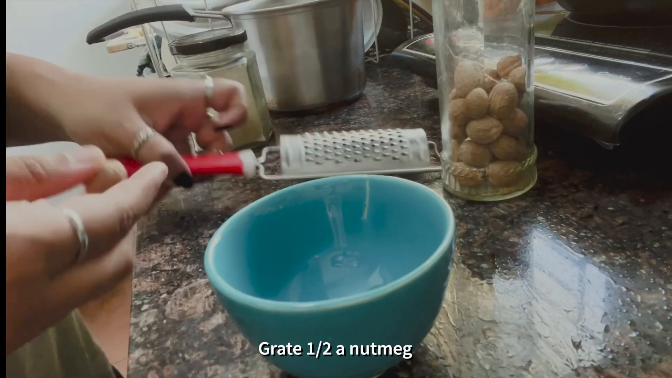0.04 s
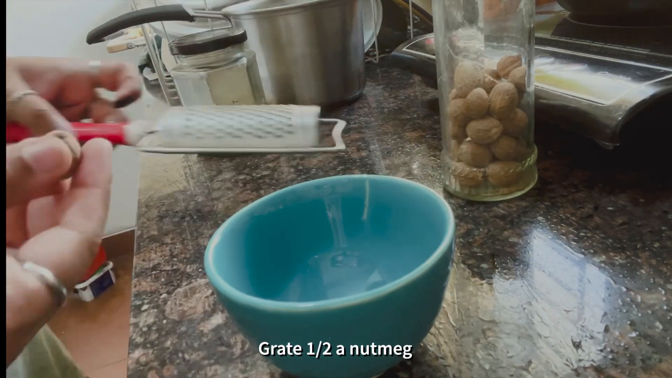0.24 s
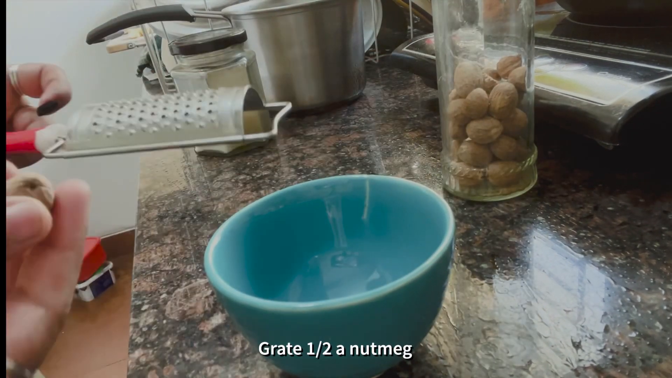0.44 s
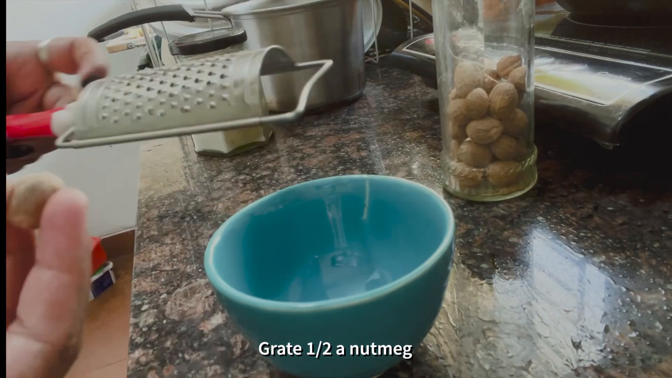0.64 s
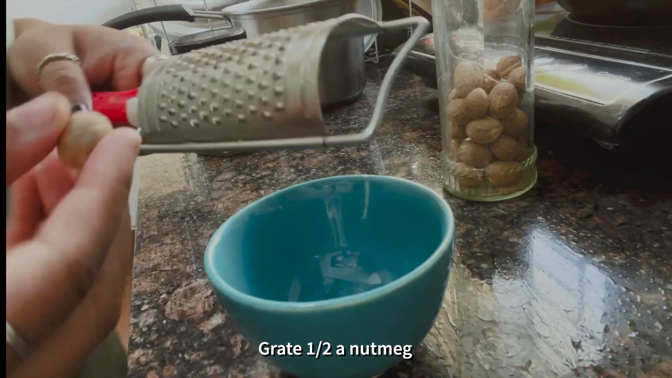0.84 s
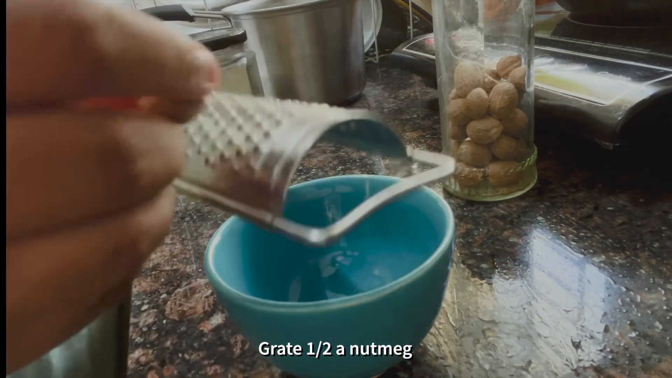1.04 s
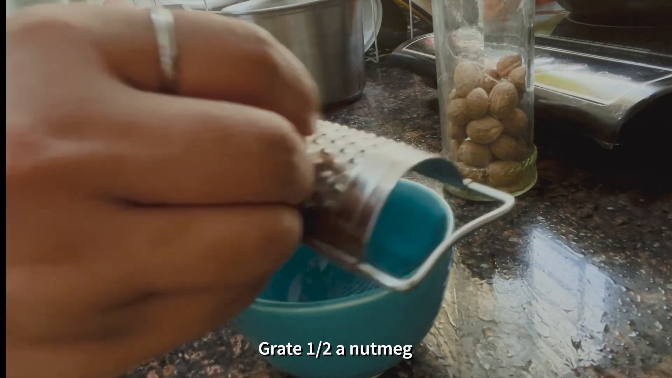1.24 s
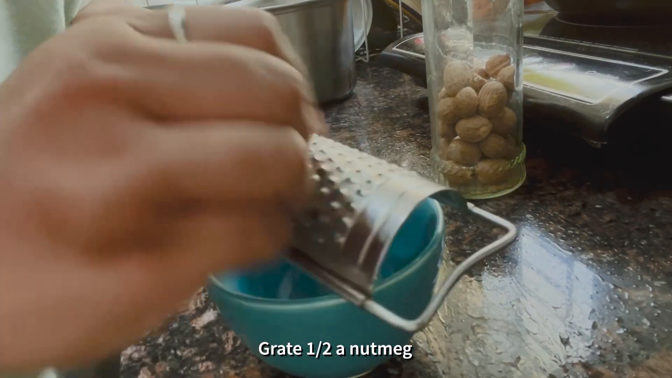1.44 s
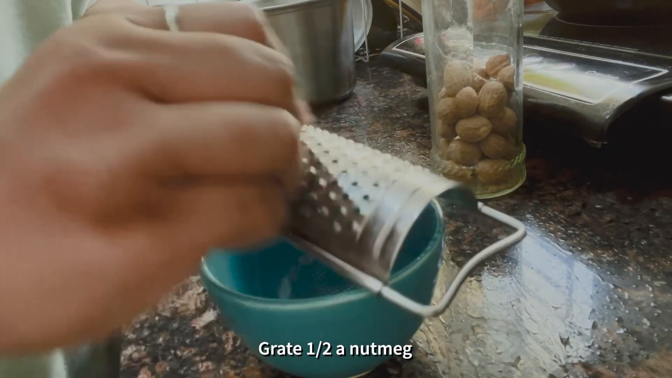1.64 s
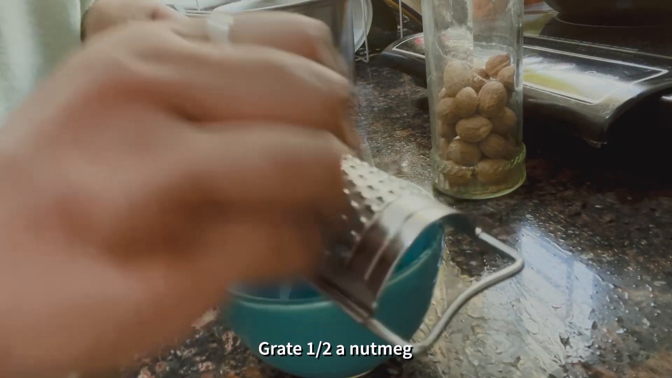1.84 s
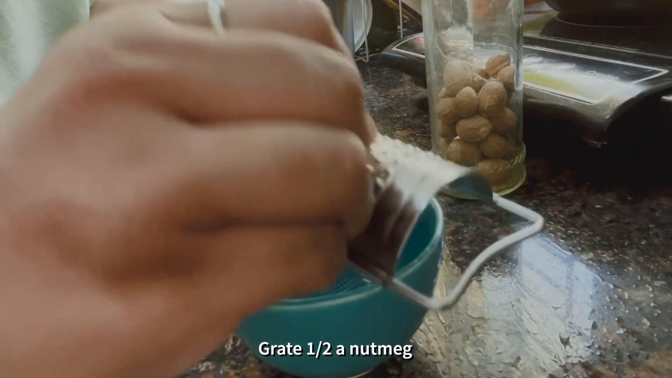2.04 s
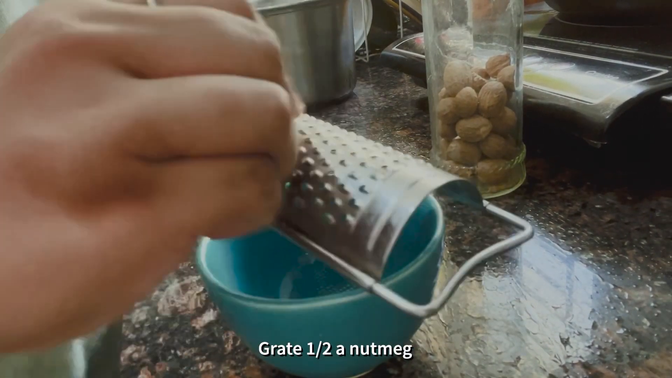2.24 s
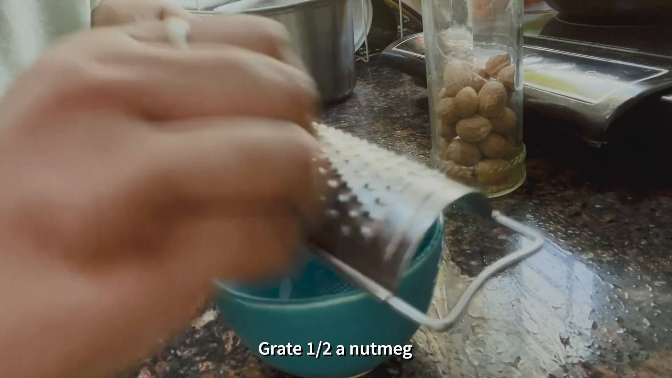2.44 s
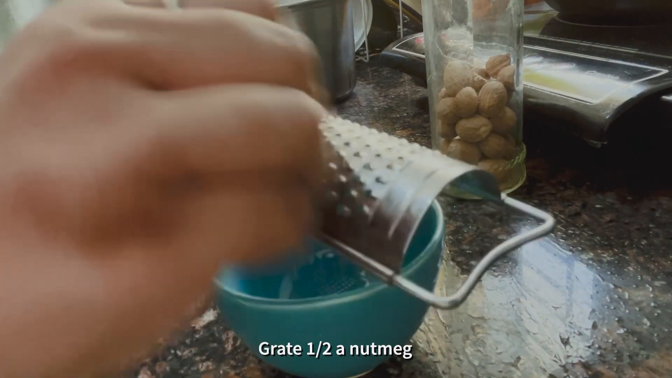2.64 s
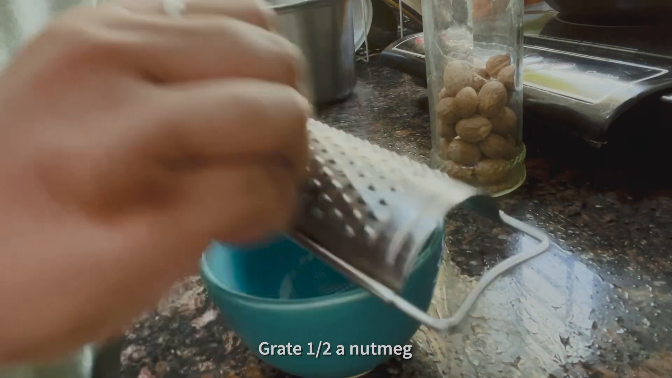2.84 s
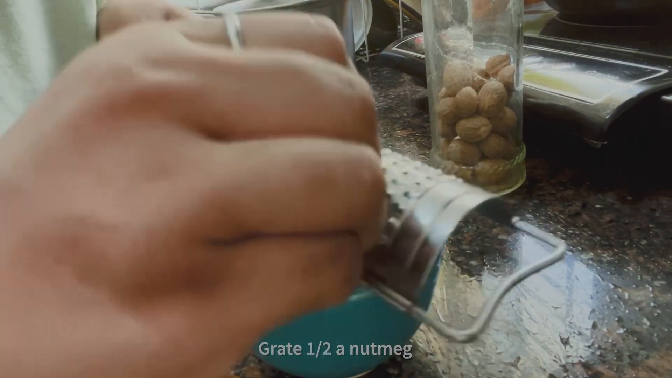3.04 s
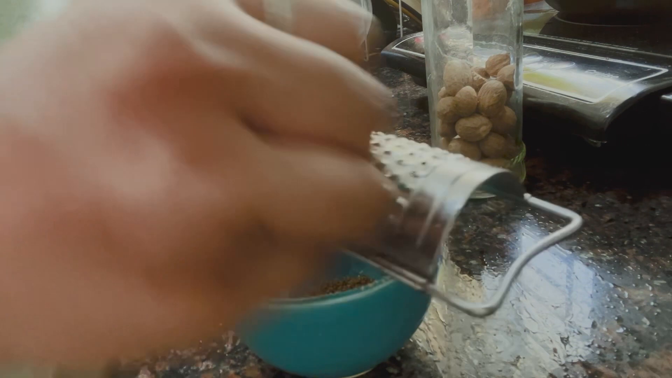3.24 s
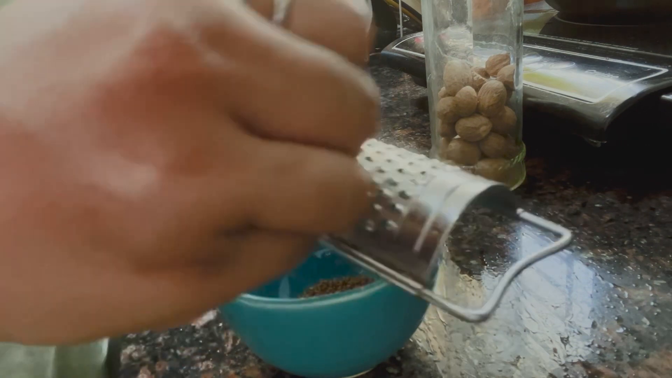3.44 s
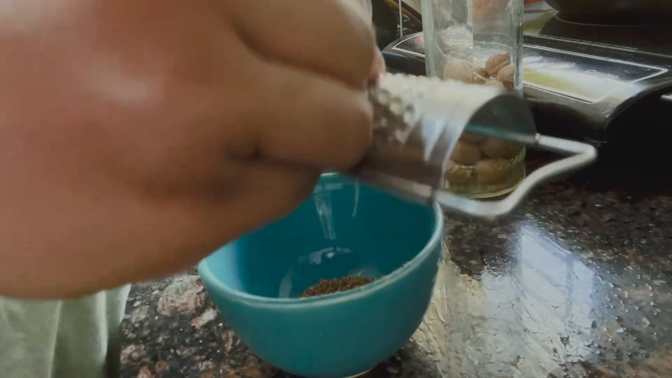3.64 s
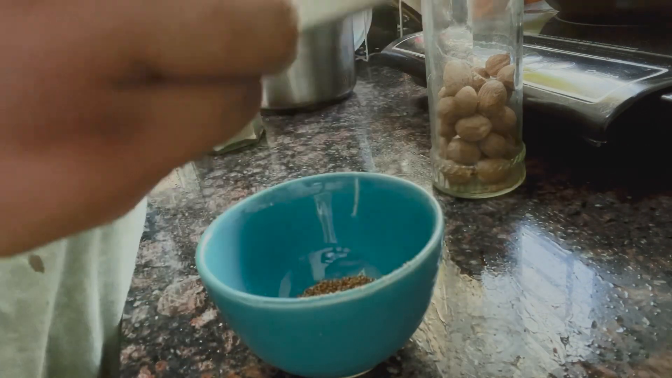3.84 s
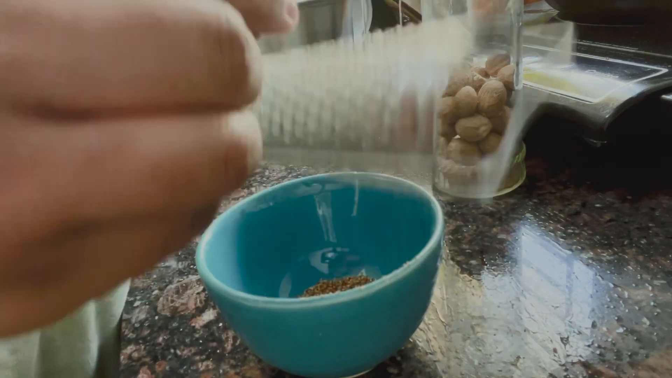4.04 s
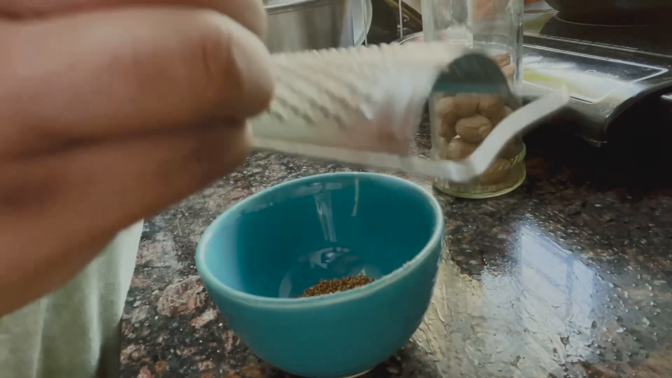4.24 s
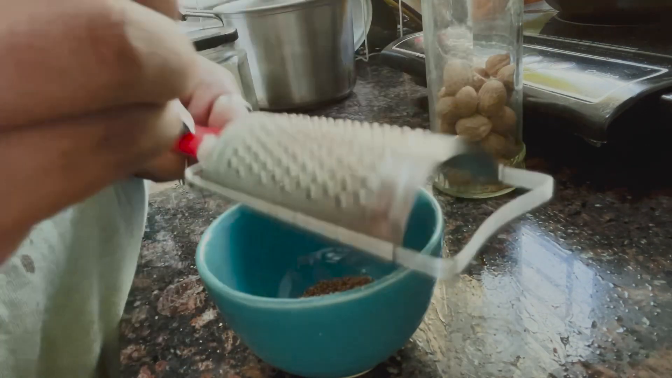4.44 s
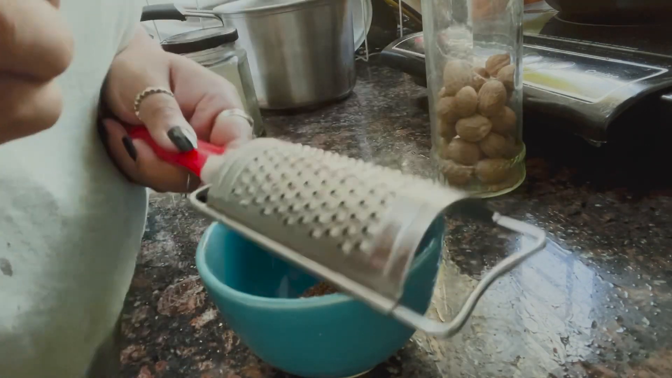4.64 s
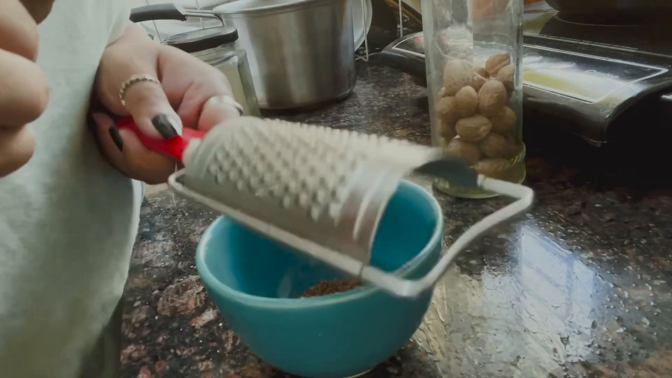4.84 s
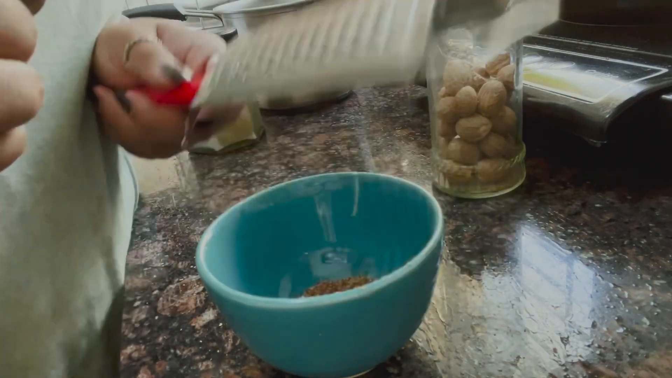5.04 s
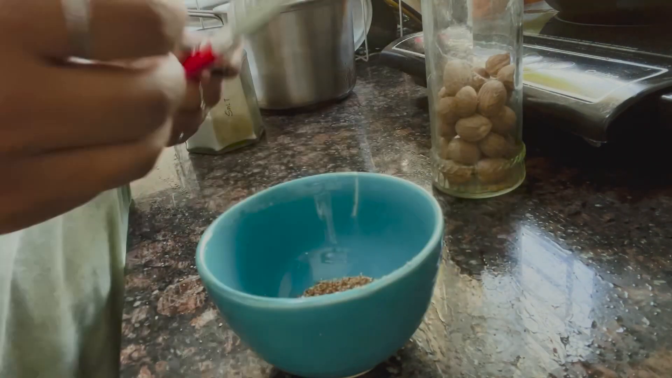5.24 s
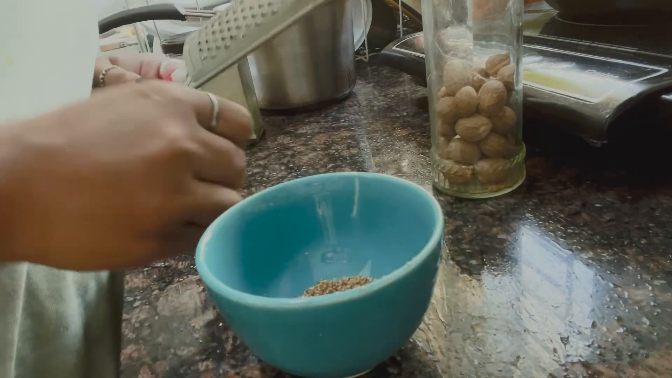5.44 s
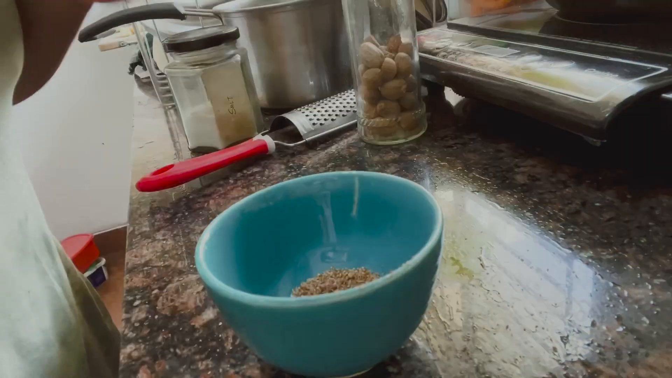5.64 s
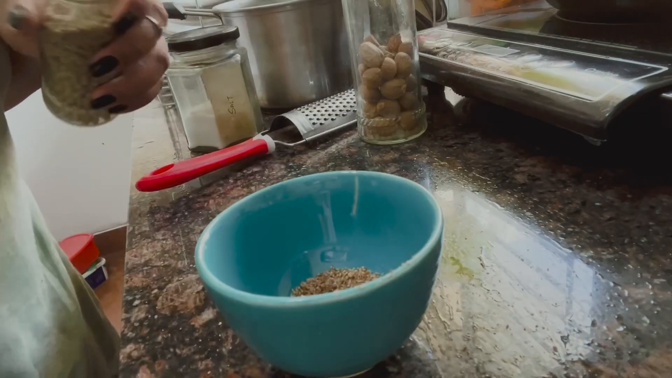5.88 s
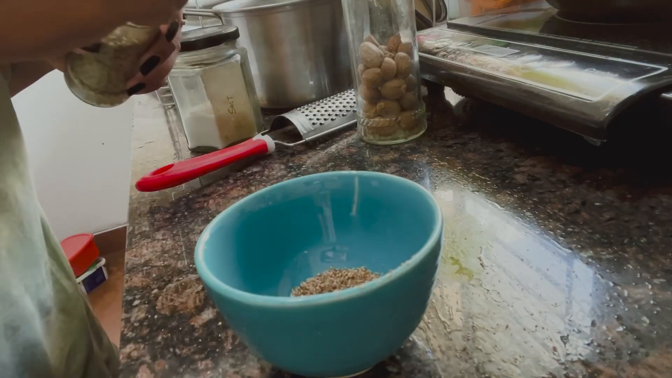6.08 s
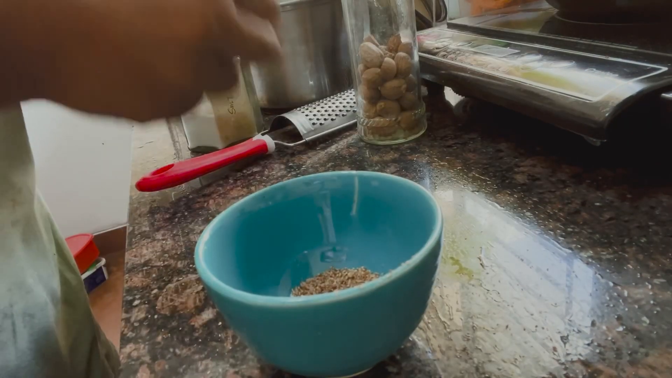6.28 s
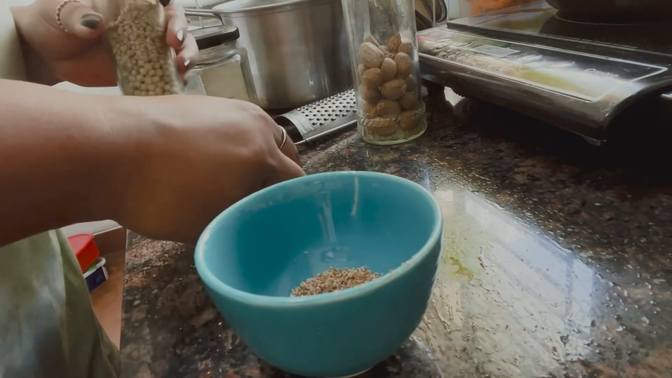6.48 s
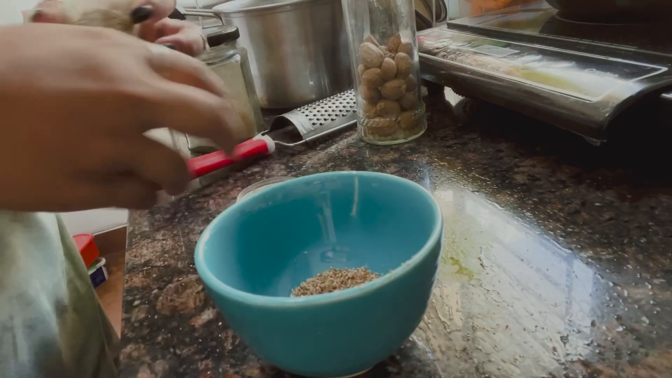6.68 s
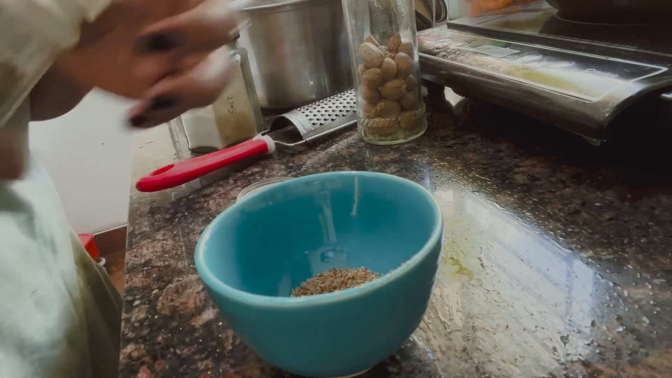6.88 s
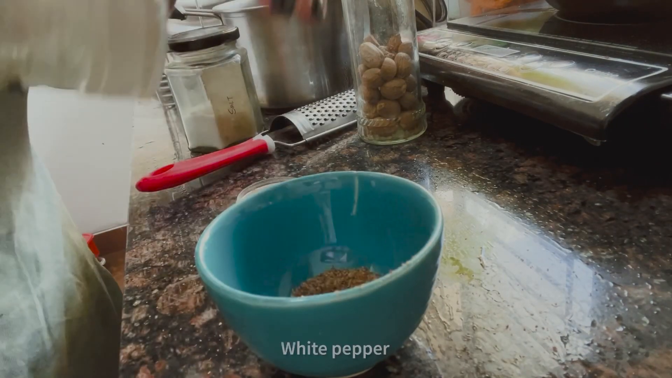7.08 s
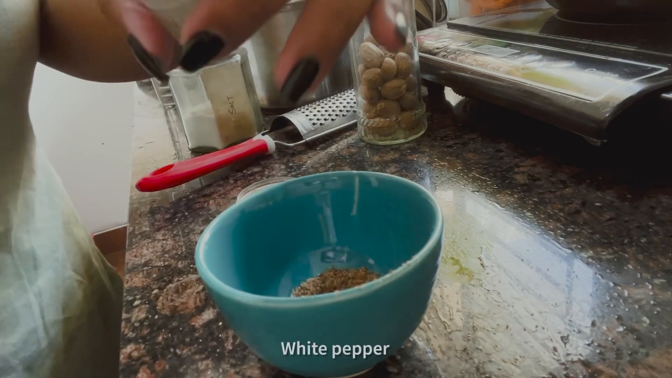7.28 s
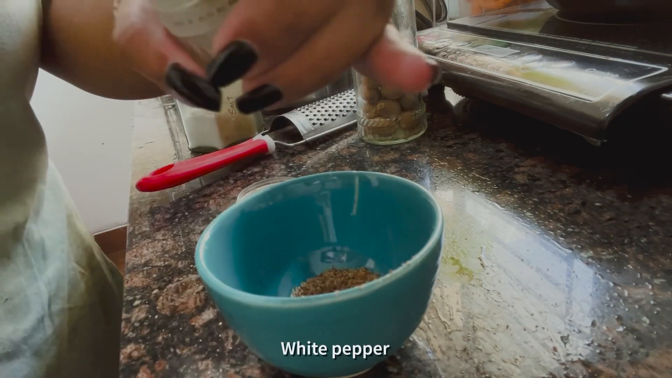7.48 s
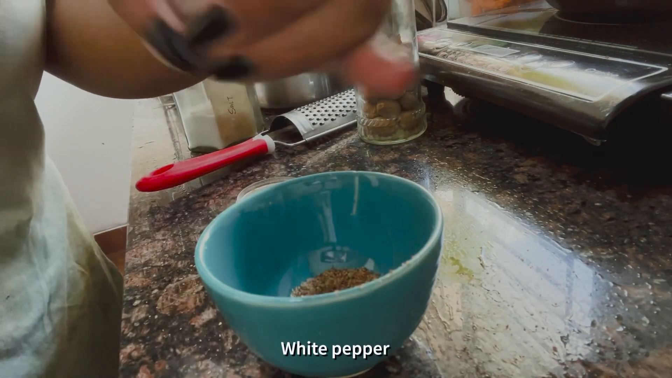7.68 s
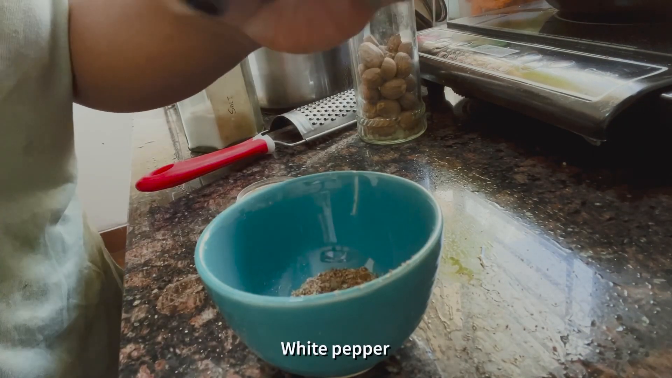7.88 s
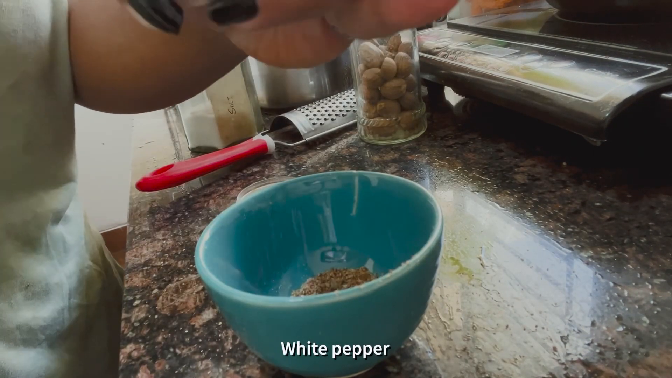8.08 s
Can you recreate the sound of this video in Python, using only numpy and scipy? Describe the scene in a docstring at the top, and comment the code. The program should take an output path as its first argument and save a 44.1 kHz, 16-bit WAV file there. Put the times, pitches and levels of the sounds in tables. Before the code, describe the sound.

A small hard-surfaced kitchen, heard close in stereo, with soft low rumble, unsteady low hum and faint hiss throughout. At 0.05 s a steel grater gives a short double clack with a brief ring. Light brushing begins near 1.2 s, and from 1.4 to 3.4 s a nutmeg is rasped to and fro, about six or seven cycles a second, gritty and bright, growing stronger after 2.5 s, with single snags and a low shudder. Sharp hollow knocks break in at 1.7 and 1.9 s, and another at 3.3 s ends it. Very faint thin whistles pass around 4 s. Five taps, 4.35 to 4.9 s, clean the grater, each with a rebound and chatter. It clacks aside at 5.3 s. Jars bump from 5.7 s, one thuds down at 6.1 s, and glass pings until 6.6 s. From 6.8 s a lid is twisted, rubbing, with dense bright clicks from 7.2 to 8 s.

```python
"""A steel grater clacks as it is taken up in a softly rumbling, humming kitchen, then a nutmeg is rubbed on it.
The rasp is many tiny filtered fractures under stroke-shaped pressure, with single snags and a low shudder.
Knocks on the grater, filtered bursts with a rebound and chatter, break in and later tap it clean over a bowl.
It is put aside with clacks; jars bump, knock and ping (bursts and decaying sines) and a lid is worked open
(clicks and a stick-slip rub). Faint thin whistles are wavering sines; rumble, hiss and hum are shaped noise."""
import sys
import numpy as np
from scipy import signal
from scipy.fft import rfft, irfft, next_fast_len
from scipy.io import wavfile
from scipy.ndimage import uniform_filter1d

SR = 44100
rng = np.random.default_rng(int(sys.argv[2]) if len(sys.argv) > 2 else 0)


def generate_wav(sig):
    """Save sig (samples, or channels by samples) to the path in sys.argv[1] as 16-bit PCM at SR."""
    pcm = np.round(np.clip(np.atleast_2d(sig).T, -1, 1) * 32767).astype(np.int16)
    wavfile.write(sys.argv[1], SR, pcm)


N = 358091
TIME_S = np.arange(N) / SR
SPAN = next_fast_len(N)
BINS_HZ = np.fft.rfftfreq(SPAN, 1 / SR)

# Levels are before room and trims; colours are relative, as colour() sets the filter energy to 1.
# room air colour: (frequency [Hz], level [dB])
AIR_COLOUR = [(20, -21), (45, -6), (100, -6.5), (150, -6.5), (335, -10.5), (600, -12.5), (760, -17.5),
              (1130, -17), (1800, -25), (4500, -34), (7000, -38), (11000, -47), (16000, -51.5)]
# likeness of the two channels in the room noise: (frequency [Hz], likeness [0-1])
AIR_LIKENESS = [(30, 0.7), (110, 0.96), (300, 0.72), (700, 0), (2000, 0)]
RUMBLE_DB = -44
# low wavering hum: (time [s], level [dB])
HUM_LEVEL = [(0, -48.5), (1.05, -44.5), (1.5, -48), (4.15, -51.5), (4.5, -59), (6.9, -59.5), (8.12, -53)]
HUM_HZ = 101.8

# to-and-fro cycles of the nut, draw then push: (time [s], draw pressure [dB], push pressure [dB])
STROKES = [(1.437, -29.5, -27.5), (1.608, -29, -33), (1.763, -28, -32), (1.922, -28, -24.5),
           (2.075, -31.5, -30.5), (2.226, -30.5, -27.5), (2.37, -31.5, -25), (2.503, -25.5, -22),
           (2.646, -25, -24), (2.783, -30.5, -19.5), (2.929, -25.5, -22), (3.065, -31.5, -21.5),
           (3.228, -30.5, -25.5)]
STOP_S = 3.37  # end of the last cycle
# shares of a cycle: start of the push, length of the draw, length of the push
TURN_SHARE, DRAW_SHARE, PUSH_SHARE = 0.47, 0.38, 0.4
DRAW_CREST, PUSH_CREST = 0.66, 0.77  # place of the hardest pressure in each half, 0-1
# nut brushing the teeth between strokes:
# (time [s], length [s], pressure [dB], crest [share of length, limited to 0.05-0.95])
BRUSH = (1.18, 1.79, -45, 3.6)
LEAD_IN_S, LEAD_IN_DB = 0.0077, -24.5  # short soft rasp leading into each knock
# single snags of a tooth, strong and faint, each breaking off a chip: (time [s], level [dB])
SNAGS = [(1.124, -43.5), (1.45, -30), (1.5365, -27), (1.785, -32.5), (1.853, -25), (1.858, -26.5),
         (1.94, -29.5), (1.951, -30), (2.0147, -27.5), (2.143, -31.5), (2.167, -21.5), (2.178, -32),
         (2.2482, -26), (2.296, -32.5), (2.3143, -26), (2.383, -42), (2.4065, -27.5), (2.463, -27),
         (2.478, -31.5), (2.553, -33), (2.583, -23.5), (2.6739, -27), (2.741, -33), (2.756, -28),
         (2.8593, -31), (2.882, -26), (3.0037, -37), (3.0153, -27), (3.0289, -20.5), (3.1528, -21.5),
         (3.163, -26), (3.177, -27), (3.509, -39.5)]
SLIPS_PER_S, SLIP_DROP_DB = 150, 11  # mean rate is a little higher, as the rate wavers
WANDER_SHARE, WANDER_S = 0.04, 0.07  # detuning either way, time between new random places
HOLD_S, HOLD_DB, HOLD_CREST = 3.2, -45.5, 0.8  # hands jolt the grater, pick-up to end of grating
# rasp colour: (frequency [Hz], level [dB])
RASP_COLOUR = [(290, -54), (500, -15), (919, -2.5), (1300, -8.5), (1740, -3.5), (2700, -4), (3250, -6),
               (3750, -10.5), (4340, 1), (6420, -6.5), (8210, -8), (11000, -4.5), (13300, -8),
               (16000, -10.5)]
# resonances of the firmly held grater: (frequency [Hz], width [Hz], lift [dB])
HELD_SHEET = [(908, 130, 8), (1694, 260, 6.5), (2205, 150, 7), (2520, 180, -3), (3300, 390, 14),
              (4257, 170, 8.5), (4540, 180, 5), (5250, 150, 8.5), (6396, 340, 12.5), (7080, 240, 8.5),
              (7590, 300, 16.5), (8560, 330, 13.5), (9050, 210, 3), (12200, 300, 2)]

# steel clacks, grater taken up and put aside:
# (time [s], contact level [dB], frame ring [dB], rattle decay [s], clink lift [dB])
CLACKS = [(.053, -21.5, -17, 0.0039, -2), (.0625, -27, -12.5, 0.021, 1), (5.2797, -19, -36, 0.00085, 8),
          (5.2845, -33, -24.5, 0.0035, 2), (5.293, -33, -31, .012, 5)]
# loose steel colour: (frequency [Hz], level [dB])
STEEL_COLOUR = [(200, -7), (700, -4), (1300, -2), (2000, -7.5), (3200, -2), (3700, -11), (4600, 1.5),
                (5800, 4.5), (7200, 2), (9000, -0.5), (11500, -1), (16000, -5)]
# resonances of the free-hanging sheet: (frequency [Hz], width [Hz], lift [dB])
FREE_SHEET = [(667, 40, 4), (1190, 160, 3.5), (4200, 290, 12.5), (5670, 120, 4.5), (8830, 230, 8),
              (10430, 250, 3.5), (11370, 750, 8)]
# free ringing of the wire frame: (frequency [Hz], level [dB], t60 [s])
FRAME_MODES = [(607, -4.5, 0.063), (913, -10, 0.055), (1134, -13.5, 0.048), (2050, -9, 0.021),
               (4100, -29, 0.033), (5180, -19, 0.05), (8730, -6, 0.05), (9330, -13, .05),
               (11300, -24, 0.051)]
# ringing of the rim under a clink: (frequency [Hz], level [dB], t60 [s])
RIM_MODES = [(5632, 2, .13), (5725, -8, .08), (6150, -6, .07)]
RIM_DB = -27  # relative to contact level plus clink lift
CLINK_HZ, CLINK_WIDTH_HZ = 6050, 1200

# knocks on the grater, one rebound each: (time [s], crack [dB], hollow ring [dB], contact decay [s],
# rebound delay [s], rebound crack [dB], rebound ring [dB], crack pitch [Hz], ring pitch [Hz],
# lift of the upper ring [dB])
KNOCKS = [(1.6826, -14, -24, 0.0037, 0.015, -11.5, -25, 4700, 1370, 15),
          (1.865, -8.5, -22, 0.0023, 0.0097, -40, -36.5, 4700, 1510, 10.5),
          (3.3345, -7, -23.5, 0.0018, 0.012, -14, -21, 4400, 1480, 13.5),
          (4.3621, -10.5, -32, 0.00048, 0.0091, -24, -21.5, 5140, 1340, 14),
          (4.4906, -19.5, -32, 0.024, 0.011, -29.5, -25.5, 5500, 1480, 10),
          (4.629, -8, -27.5, 0.0013, .013, -39, -26, 4920, 1410, 9),
          (4.7547, -9.5, -24, 0.0048, 0.0097, -25, -24.5, 4800, 1450, 8),
          (4.894, -18.5, -24, 0.017, 0.01, -17.5, -21.5, 4600, 1390, 9)]
# crack colour: (frequency [Hz], level [dB])
CRACK_COLOUR = [(500, -25), (1500, -10.5), (2700, -5.5), (4000, -10), (4900, 1), (6000, -7), (8000, -5.5),
                (11000, -12.5), (16000, -17.5)]
# hollow ring colour: (frequency [Hz], level [dB])
HOLLOW_COLOUR = [(80, -25), (200, -3.5), (330, -4.5), (600, -6), (850, -12), (1350, -0.5), (1800, -10.5),
                 (2100, -5), (2600, -19), (6000, -36)]
# colour of the loose sheet chattering after a knock: (frequency [Hz], level [dB])
CLATTER_COLOUR = [(400, -11), (1100, 2), (2500, -4.5), (3300, 3), (5500, -13), (9000, -8.5), (16000, -17)]
REBOUND_DECAY_S = 0.0018
CLATTER_DB, CLATTER_DECAY_S = -22, 0.019  # level before the crack trim
KNOCK_MODE_SHARE = 0.55  # share of the held-sheet lifts [dB] present in a knock

# faint thin whistles: (time [s], length [s], pitch [Hz], level [dB], rms waver [share of pitch])
WHISTLES = [(3.992, 0.28, 3340, -58, 0.022), (4.008, 0.15, 2960, -58, 0.012),
            (4.055, 0.21, 3545, -62, 0.018), (6.918, 0.5, 6380, -60.5, 0.016),
            (7.737, 0.22, 4720, -55, 0.003), (7.948, 0.19, 5010, -55, 0.0091),
            (7.922, 0.15, 10500, -60, 0.0035)]
WHISTLE_FLUTTER_DB = 3.5  # rms

# clicks of nails and lid on the jar: (time [s], bright snap [dB], hollow cap [dB])
LID_CLICKS = [(5.631, -71, -45.5), (5.904, -45, -62), (5.9782, -45.5, -50), (6.021, -68, -46),
              (6.5965, -45, -44), (6.633, -47, -56), (6.953, -51, -62), (7.201, -38, -54),
              (7.2415, -37, -55), (7.2643, -41, -52), (7.31, -53, -42.5), (7.422, -49, -46.5),
              (7.4584, -19, -35), (7.512, -28.5, -32.5), (7.5236, -37, -42), (7.5305, -31, -45),
              (7.568, -37, -48), (7.5744, -23, -29), (7.5778, -23, -29), (7.5932, -31, -26.5),
              (7.674, -40, -41), (7.694, -55, -40), (7.7006, -55, -45), (7.7149, -43, -43),
              (7.7192, -31.5, -40), (7.7985, -45, -42), (7.8369, -39, -32), (7.8435, -30.5, -38),
              (7.881, -44, -28), (7.889, -29, -21), (7.906, -39, -39), (8.0155, -30.5, -28)]
# twists rubbing the lid on its thread: (time [s], length [s], effort [dB])
TWISTS = [(6.788, 0.22, -57), (7.174, 0.16, -41), (7.506, 0.046, -40), (7.558, 0.1, -43),
          (7.645, 0.14, -43.5), (7.785, 0.2, -42), (7.96, 0.32, -57)]
TWIST_CREST = 0.33  # place of the hardest grip, 0-1
SNAP_DECAY_S, CAP_DECAY_S = 0.0007, 0.0009
# nails tick at random; each level is the base plus a random lift set by the spread
FINGERING_S, TICKS_PER_S, TICK_BASE_DB, TICK_SPREAD_DB = (7.2, 7.3), 31, -57, 3
# lid snap colour: (frequency [Hz], level [dB])
SNAP_COLOUR = [(1000, -10), (3000, 3.5), (4600, 1.5), (6300, 17), (7500, 16.5), (9000, 10.5), (10500, 14),
               (12500, 4), (16000, 2.5)]
# cap colour: (frequency [Hz], level [dB])
CAP_COLOUR = [(200, -10), (750, -18), (1050, 9), (1400, -1), (2000, 10), (2900, 10), (3600, -1), (4600, 2),
              (6000, -3), (12000, -25)]
# thread rub colour: (frequency [Hz], level [dB])
THREAD_COLOUR = [(600, -15), (1100, -10), (2100, 2), (3700, -1), (4600, 4.5), (5700, 2.5), (6400, 13),
                 (7200, 0), (10500, -1), (16000, -11)]

# dull bumps of jars on the counter: (time [s], length [s], level [dB], crest [share of length])
BUMPS = [(5.706, 0.048, -34, 0.2), (6.028, 0.036, -32, 0.38), (6.352, 0.018, -33, 0.43),
         (6.365, 0.087, -40, 0.1)]
# bump colour: (frequency [Hz], level [dB])
BUMP_COLOUR = [(100, -20), (250, -0.5), (370, 0), (600, -2), (760, -14), (1200, -20), (2500, -25),
               (6000, -53), (16000, -53)]
THUD_S, THUD_DB, THUD_HZ, THUD_T60_S = 6.1225, -18, 230, 0.033  # a jar is set down
# jars touching each other: (time [s], level [dB], rattle decay [s])
JAR_KNOCKS = [(6.126, -24, 0.0028), (6.132, -37, 0.0049), (6.269, -41, 0.008), (6.279, -46, .012),
              (6.49, -40.5, 0.0028), (6.633, -42.5, 0.0042)]
# jar knock colour: (frequency [Hz], level [dB])
JAR_COLOUR = [(500, -12), (1500, -10), (2100, 1.5), (2700, 8.5), (3300, 0), (4800, -7.5), (6100, -1.5),
              (7500, -4.5), (9300, -7.5), (12000, -12.5), (16000, -24)]
# jar pings: (time [s], level [dB], sustain [share of free t60])
PINGS = [(6.27, -46, 0.6), (6.4924, -31.5, 0.82), (6.636, -37, 0.18)]
# free ringing of the jar: (frequency [Hz], level [dB], t60 [s])
GLASS_MODES = [(2830, -12, 0.11), (3120, 6, 0.12), (3165, 11, 0.084), (4820, 5.5, 0.042),
               (5180, -12, 0.048), (6750, -0.5, 0.034), (6980, 3, 0.034), (9250, -16, 0.026)]

# kitchen decay: (frequency [Hz], t60 [s])
KITCHEN_DECAY = [(150, 0.4), (1000, 0.27), (4000, 0.32), (9000, 0.29), (16000, 0.25)]
# phase lead of the left channel over the right: (frequency [Hz], lead [rad])
LEFT_LEAD = [(0, 0), (350, 0), (900, -1.2), (1800, -1.3), (2600, -3), (3400, -3.9), (4000, -6.3),
             (5800, -6.4), (7000, -4.2), (8400, -3.1), (10200, -.1), (11600, .1), (12700, 3), (14000, 3.3),
             (15400, 6.2)]
# blend of the two channels by frequency: (frequency [Hz], blend [0-1, 1 = equal shares])
CHANNEL_BLEND = [(0, 0), (4000, 0), (6500, .1), (7800, .7), (16000, .75)]
EDGE_HZ = 15850


def amp(db):
    """Decibels to gain."""
    return 10 ** (np.asarray(db) / 20)


def evened(x):
    """Scales to rms 1."""
    return x / np.sqrt(np.mean(x ** 2) + 1e-20)


def read(points, hz):
    """Reads a table on a log-frequency axis."""
    f, value = np.transpose(points)
    return np.interp(np.log(hz + 1), np.log(f + 1), value)


def add(mix, s, sound):
    """Mixes a stereo sound in at time s."""
    part = mix[:, round(s * SR):][:, :sound.shape[1]]
    part += sound[:, :part.shape[1]]


def humps(peaks, hz):
    """The dB curve of a set of resonances."""
    return sum(db / (1 + (2 * (hz - f) / width) ** 2) for f, width, db in peaks)


def colour(x, spectrum, peaks=(), size=4096):
    """Causal minimum-phase filter of energy 1: a broad colour with resonances on top."""
    hz = abs(np.fft.fftfreq(size, 1 / SR))
    log_gain = np.log(amp(read(spectrum, hz) + humps(peaks, hz)))
    taps = np.fft.ifft(np.exp(np.conj(signal.hilbert(log_gain)))).real[:size // 2]
    return signal.oaconvolve(x, taps[None] / np.linalg.norm(taps), axes=1)[:, :N]


def partly_alike(a, b, same):
    """Two channels of equal power that share part of their noise."""
    return np.array([a, same * a + np.sqrt(1 - same ** 2) * b])


def blow(decay_s, same=0.56, size=8192):
    """A contact: a spectrally flattened burst that dies away; rms 1 over its first 5 ms."""
    t = np.arange(size) / SR
    decay_s = max(decay_s, 0.0003)
    a, b = rng.standard_normal((2, size))
    x = partly_alike(a, b, np.clip(same, 0, 1))
    rise_s = min(decay_s / 2, 0.0007)  # a longer contact also starts more softly
    x *= np.exp(-t / decay_s) * (1 - np.exp(-t / rise_s))
    z = rfft(x, 2 * size)
    smooth_power = uniform_filter1d(abs(z) ** 2, size // 24, axis=1)
    x = irfft(z / np.sqrt(smooth_power + 1e-12))[:, :size]
    return x / np.sqrt(np.mean(x[:, t < 0.005] ** 2))


def blows(s, db, decay_s):
    """A track of contacts; the level is that of the first 5 ms."""
    out = np.zeros((2, N))
    for at, level_db, length_s in np.broadcast(s, db, decay_s):
        add(out, at, amp(level_db) * blow(length_s))
    return out


def rings(s, db, modes, sustain=1):
    """A track of blows on an object ringing in decaying modes; a hand on it shortens every t60."""
    out, t = np.zeros((2, N)), np.arange(SR // 2) / SR
    for at, level_db, held in np.broadcast(s, db, sustain):
        ring = np.zeros((2, len(t)))
        for f, mode_db, t60_s in modes:
            turns = f * t + rng.random() + rng.random((2, 1)) / 3  # phases differ a little per channel
            ring += amp(mode_db - 60 * t / (t60_s * held)) * np.sin(2 * np.pi * turns)
        add(out, at, amp(level_db) * ring * (1 - np.exp(-t / 0.00021)))
    return out


def grains(per_s, spread_db, decay_s, count=5):
    """Tiny fractures of uneven size, spread over several contact points; rms 1."""
    size = amp(spread_db * np.minimum(rng.exponential(1, N), 3)) * (rng.random(N) < per_s / SR)
    point = rng.integers(0, count, N)
    out = np.zeros((2, N))
    for k in range(count):
        out += signal.oaconvolve((size * (point == k))[None], blow(decay_s), axes=1)[:, :N]
    return evened(out)


def kitchen(x, wet_db, early_db, count=18):
    """Direct sound, early echoes off counter and bowl, and the tail of a small hard room."""
    t = np.arange(SR // 2) / SR
    hz, when_s, z = signal.stft(rng.standard_normal((2, len(t))), SR, nperseg=256)
    decay = amp(-60 * when_s / read(KITCHEN_DECAY, hz)[:, None])
    tail = signal.istft(z * decay, SR, nperseg=256)[1][:, :len(t)]
    tail *= 1 - np.exp(-(t / 0.0068) ** 2)
    response = amp(wet_db) * tail / np.linalg.norm(tail, axis=1, keepdims=True)
    for side in response:
        delays = (rng.uniform(0.002, 0.014, count) * SR).astype(int)
        side[delays] += amp(early_db) * rng.choice([-1, 1], count) / np.sqrt(count)
    return x + signal.fftconvolve(x, response, axes=1)[:, :x.shape[1]]


def arches(rows):
    """Pressure of hand movements (s, length s, dB, crest): each swells to its crest and lets go."""
    out = np.zeros(N)
    for s, length_s, db, crest in rows:
        crest_s = s + length_s * np.clip(crest, 0.05, 0.95)
        ramp = np.interp(TIME_S, [s, crest_s, s + length_s], [0, 1, 0])
        out += amp(db) * np.sin(np.pi / 2 * ramp)
    return out


def catches(per_s, drop_db):
    """Stick-slip: at uneven intervals a contact slips free; each slip flares and dies."""
    waver = evened(uniform_filter1d(rng.standard_normal(N), 300))
    teeth = np.cumsum(per_s * np.exp(0.5 * waver)) / SR
    bite = rng.uniform(-1.5, 1, N)[teeth.astype(int)]
    return evened(amp(drop_db * (0.3 * bite - teeth % 1)))


def shifting(x, depth_db, size=256, order=9):
    """As the point of contact moves, patches of the spectrum come up and fade."""
    z = signal.stft(x, nperseg=size, noverlap=size * 3 // 4)[2]
    patches = uniform_filter1d(rng.standard_normal(z.shape[1:]), 3, axis=0)
    patches = uniform_filter1d(patches, 3 * order, axis=1)
    gain = evened(amp(depth_db * evened(patches)))
    return signal.istft(z * gain, nperseg=size, noverlap=size * 3 // 4)[1][:, :N]


def room_noise():
    """Low rumble under a faint even hiss: filtered noise, alike in both channels only at low frequencies."""
    a, b = rfft(rng.standard_normal((2, SPAN)))
    same = np.clip(read(AIR_LIKENESS, BINS_HZ), 0, 1)
    noise = colour(irfft(partly_alike(a, b, same), SPAN), AIR_COLOUR, [(328.4, 46, 5.6)])
    return noise * amp(RUMBLE_DB)


def hum():
    """A narrow band of low noise, heard as an unsteady hum."""
    band = 1 / (1 + ((BINS_HZ - HUM_HZ) / 8) ** 2)
    drone = irfft(rfft(rng.standard_normal(SPAN)) * band, SPAN)[:N]
    return evened(drone) * amp(np.interp(TIME_S, *np.transpose(HUM_LEVEL)))


def pressure():
    """Pressure on the teeth: draw and push per cycle, brushing, a short soft rasp leading into each knock."""
    moves = [(s - LEAD_IN_S, LEAD_IN_S, LEAD_IN_DB, 0.8) for s, *_ in KNOCKS]
    cycles_s = np.diff([s for s, *_ in STROKES] + [STOP_S])
    for (s, draw_db, push_db), cycle_s in zip(STROKES, cycles_s):
        moves.append((s, DRAW_SHARE * cycle_s, draw_db, DRAW_CREST))
        moves.append((s + TURN_SHARE * cycle_s, PUSH_SHARE * cycle_s, push_db, PUSH_CREST))
    return arches(moves + [BRUSH])


def travelling(x, count=3):
    """The grip retunes the sheet: random places, joined smoothly, crossfade detuned resonances."""
    turns_s = np.arange(0, N / SR, WANDER_S)
    place = np.interp(TIME_S, turns_s, rng.uniform(-1, 1, len(turns_s)))
    out = np.zeros((2, N))
    for spot in np.linspace(-1, 1, count):
        modes = [(hz * (1 + WANDER_SHARE * spot), width, db) for hz, width, db in HELD_SHEET]
        nearness = np.maximum(1 - abs(np.sin(np.pi / 2 * place) - spot), 0)
        out += colour(x * nearness, RASP_COLOUR, modes)
    return out


def grating():
    """Strokes drag the nut over the teeth: a rasp of fractures, snags, and a low shudder of the hands."""
    push = pressure()
    s, db = np.transpose(SNAGS)
    fine = amp(-10) * grains(per_s=2200, spread_db=-1.0, decay_s=0.00061)
    coarse = amp(-12.5) * grains(per_s=380, spread_db=3.5, decay_s=0.00053)
    slips = catches(SLIPS_PER_S, SLIP_DROP_DB)
    teeth = push * slips * (fine + coarse) + blows(s, db, 0.0018)
    rasp = shifting(travelling(teeth), depth_db=4)
    shudder_colour = [(25, -17.5), (70, -0.5), (170, -8.0), (350, -18.0), (700, -40.5), (2000, -59.5)]
    shudder = colour(rng.standard_normal((2, N)), shudder_colour)
    shudder = shudder + 0.2 * shudder[::-1]
    shudder *= amp(-17.0) * push + arches([(0.014, HOLD_S, HOLD_DB, HOLD_CREST)])
    return kitchen(rasp * amp([[-0.8], [0.8]]), wet_db=-13.5, early_db=-7.0) + shudder


def clacks():
    """The grater rattles briefly and its frame rings; a blow on the rim adds a bright clink."""
    s, db, ring_db, decay_s, clink_db = np.transpose(CLACKS)
    out = rings(s, ring_db, FRAME_MODES) + rings(s, db + clink_db + RIM_DB, RIM_MODES)
    for at, level_db, length_s, lift_db in zip(s, db, decay_s, clink_db):
        clink = (CLINK_HZ, CLINK_WIDTH_HZ, lift_db)
        add(out, at, colour(amp(level_db) * blow(length_s), STEEL_COLOUR, FREE_SHEET + [clink]))
    return kitchen(out, wet_db=-8.0, early_db=-3.5)


def tapping():
    """Knocks with rebound and chatter: a hard crack and the curved sheet's hollow ring, tuned by the spot."""
    out, t = np.zeros((2, N)), np.arange(SR // 4) / SR
    chatter = grains(per_s=600, spread_db=4.5, decay_s=0.00063, count=3)
    modes = [(hz, width, KNOCK_MODE_SHARE * db) for hz, width, db in HELD_SHEET]
    for (s, crack_db, ring_db, decay_s, after_s, rebound_db, rebound_ring_db,
         crack_hz, ring_hz, upper_db) in KNOCKS:
        contacts, thumps, clatter = np.zeros((3, 2, SR // 2))
        add(contacts, 0, amp(crack_db) * blow(decay_s))
        add(contacts, after_s, amp(rebound_db) * blow(REBOUND_DECAY_S))
        add(thumps, 0, amp(ring_db) * blow(0.0023))
        add(thumps, after_s, amp(rebound_ring_db) * blow(0.0016))
        piece = chatter[:, round(s * SR):][:, :len(t)]
        add(clatter, after_s, amp(CLATTER_DB) * np.exp(-t / CLATTER_DECAY_S) * piece)
        crack = colour(contacts, CRACK_COLOUR, modes + [(crack_hz, 900, 8)])
        crack = amp(-8.0) * (crack + colour(clatter, CLATTER_COLOUR, modes))
        hollow = colour(thumps, HOLLOW_COLOUR, [(ring_hz, 400, 7), (2090, 130, upper_db)])
        add(out, s, kitchen(crack, wet_db=-9.0, early_db=-13.5))
        add(out, s, kitchen(hollow, wet_db=-5, early_db=-2.0))
    return out * amp([[-1.5], [1.3]])


def whistles():
    """Thin tones, wavering in pitch and level, that swell and fade, blurred by the room."""
    out = np.zeros((2, N))
    for s, length_s, hz, db, waver in WHISTLES:
        t = np.arange(0, length_s, 1 / SR)
        drift = evened(uniform_filter1d(rng.standard_normal(len(t)), 200))
        tone = np.sin(2 * np.pi * np.cumsum(hz * (1 + waver * drift)) / SR)
        tone *= signal.windows.tukey(len(t), 0.5)
        flutter = evened(uniform_filter1d(rng.standard_normal(len(t)), size=1300, mode="wrap"))
        tone *= amp(WHISTLE_FLUTTER_DB * flutter)
        add(out, s, amp(db) * np.array([tone, tone]))
    return kitchen(out, wet_db=-2, early_db=-8)


def lid():
    """Bright snaps with hollow cap clicks, nails ticking on the jar, and a stick-slip rub on the thread."""
    s, snap_db, cap_db = np.transpose(LID_CLICKS)
    count = round(TICKS_PER_S * (FINGERING_S[1] - FINGERING_S[0]))
    when, size = rng.random((100, 2))[:count].T
    tick_db = TICK_BASE_DB - TICK_SPREAD_DB * np.log(size + 0.054)
    ticks = blows(np.interp(when, [0, 1], FINGERING_S), tick_db, SNAP_DECAY_S)
    snaps = blows(s, snap_db - 0.5, SNAP_DECAY_S)
    caps = blows(s, cap_db + 0.5, CAP_DECAY_S)
    clicks = colour(snaps + ticks, SNAP_COLOUR) + colour(caps + ticks, CAP_COLOUR)
    effort = arches([(*twist, TWIST_CREST) for twist in TWISTS])
    slips = catches(per_s=110, drop_db=5)
    rub = effort * slips * colour(grains(per_s=1900, spread_db=13, decay_s=0.0036), THREAD_COLOUR)
    worked = shifting(clicks + rub, depth_db=2)
    return kitchen(worked, wet_db=-12.0, early_db=-10.0)


def jars():
    """Dull juddering bumps on the counter, a thud, and glass knocks and pings."""
    judder = grains(per_s=900, spread_db=2.5, decay_s=0.0012)
    judder = colour(judder, BUMP_COLOUR, [(378, 45, 4.2), (575, 120, 2.2)])
    local_power = uniform_filter1d((judder ** 2).mean(0), size=900)
    bumps = arches(BUMPS) * judder / np.sqrt(local_power + 1e-9)
    thud = rings(THUD_S, THUD_DB, [(THUD_HZ, 0, THUD_T60_S), (330, -6, 0.03), (540, -13, 0.03)])
    touches = blows(*np.transpose(JAR_KNOCKS))
    knocks = colour(touches, JAR_COLOUR, [(2920, 200, 2.2), (3600, 200, 4.4), (6030, 200, 3.7)])
    s, db, sustain = np.transpose(PINGS)
    pings = rings(s, db, GLASS_MODES, sustain)
    out = kitchen(bumps + thud, wet_db=-4.0, early_db=-23)
    out += kitchen(knocks, wet_db=-1.0, early_db=-4.5)
    return out + kitchen(pings, wet_db=-11.5, early_db=-12)


def scene():
    """Everything on and around the counter."""
    return room_noise() + hum() + grating() + clacks() + tapping() + whistles() + lid() + jars()


def record(dry):
    """Blends the channels in the treble and offsets their phase; then the band limit."""
    z = rfft(dry, SPAN)
    angle = np.pi / 4 * read(CHANNEL_BLEND, BINS_HZ)
    z = np.cos(angle) * z + np.sin(angle) * z[::-1]
    lead = read(LEFT_LEAD, BINS_HZ) * np.array([[1], [-1]])
    heard = irfft(z * np.exp(0.5j * lead), SPAN)[:, :N]
    lowpass = signal.firwin(301, EDGE_HZ, window=("kaiser", 9), fs=SR)
    return signal.oaconvolve(heard, lowpass[None], "same")


dry = scene()
out = record(dry)
generate_wav(out)
```